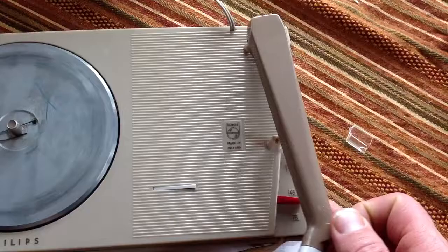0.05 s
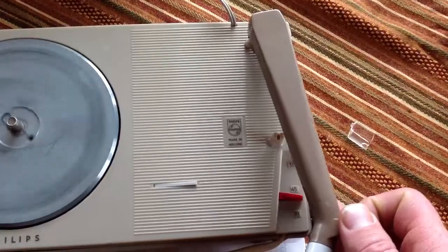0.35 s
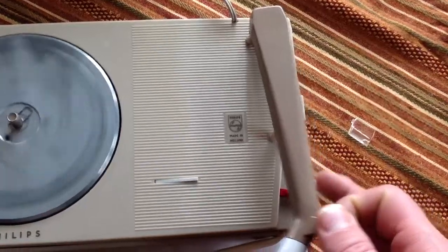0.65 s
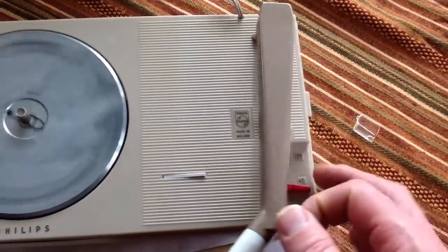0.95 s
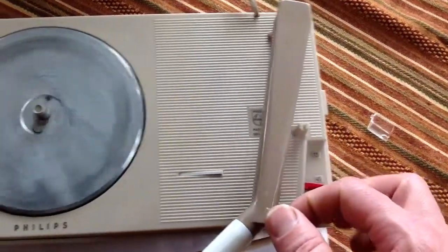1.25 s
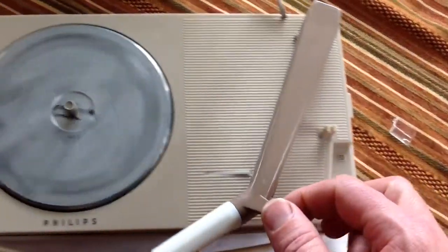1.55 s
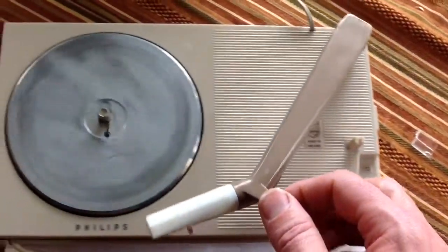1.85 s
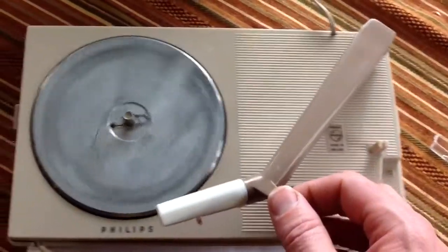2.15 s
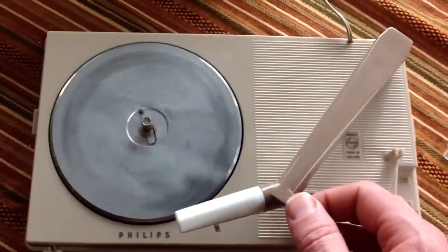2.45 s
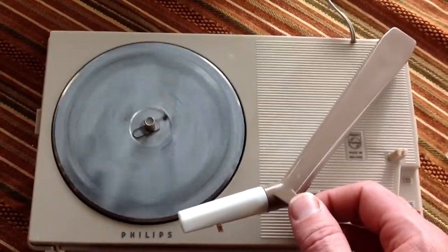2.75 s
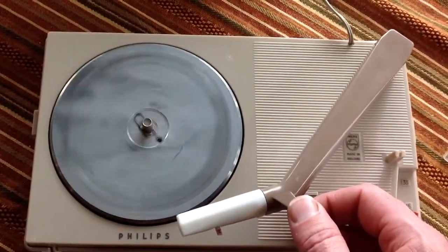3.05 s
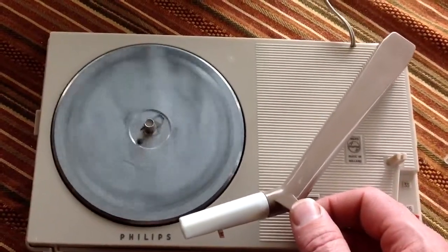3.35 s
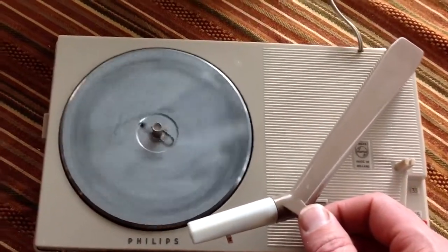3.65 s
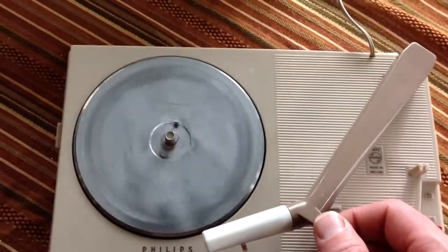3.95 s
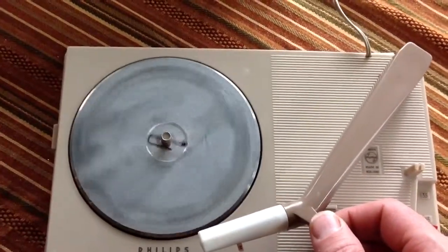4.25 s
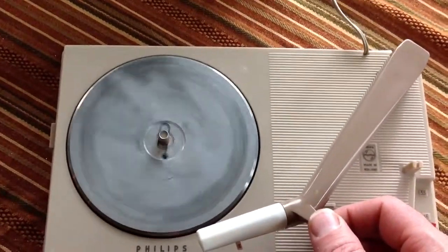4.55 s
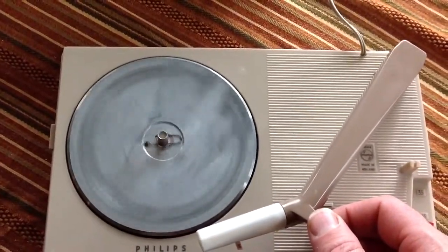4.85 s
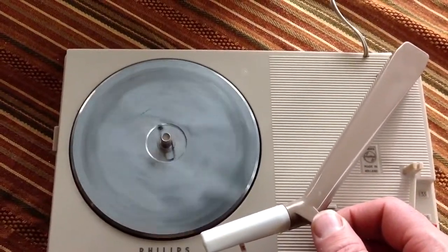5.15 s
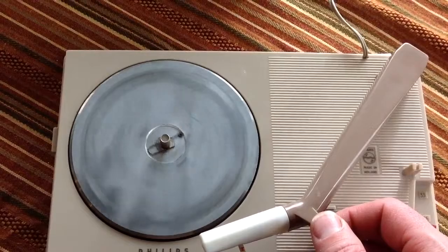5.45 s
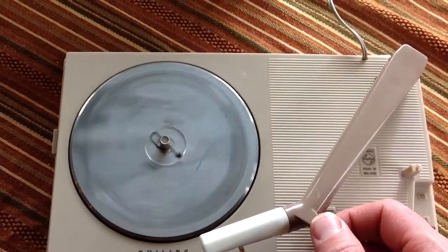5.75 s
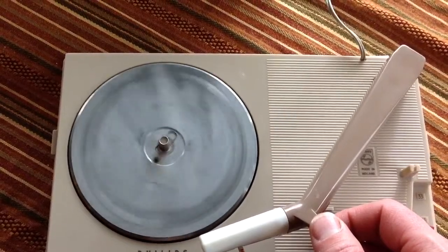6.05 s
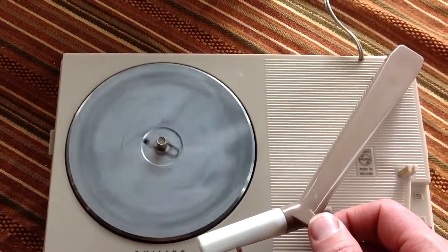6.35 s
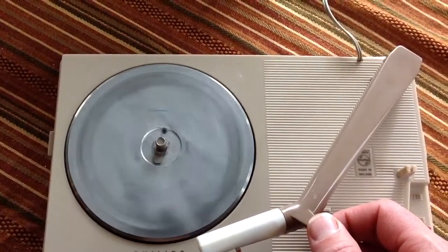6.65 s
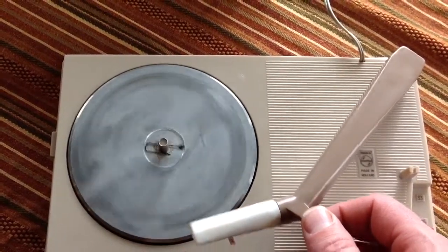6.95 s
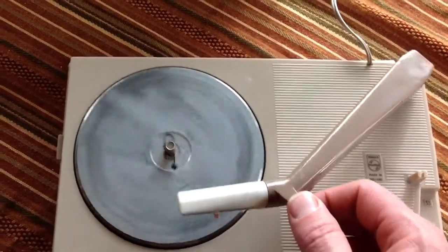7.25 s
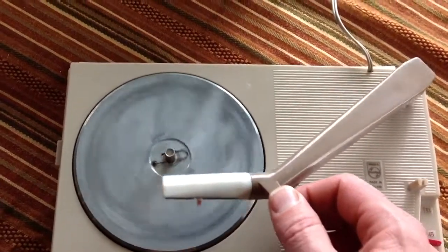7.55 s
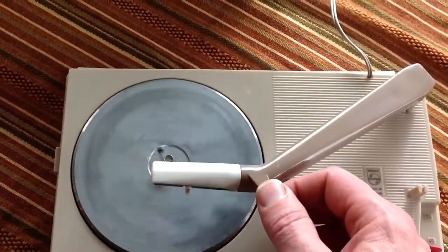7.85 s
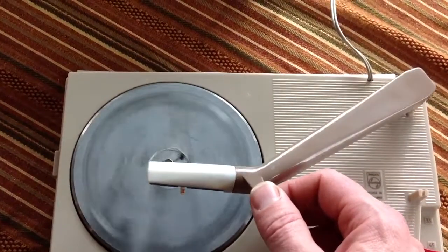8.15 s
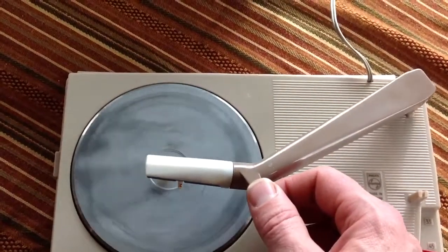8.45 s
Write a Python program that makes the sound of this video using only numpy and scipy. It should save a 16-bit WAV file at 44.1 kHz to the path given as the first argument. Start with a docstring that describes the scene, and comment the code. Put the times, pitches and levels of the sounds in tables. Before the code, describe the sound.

A small plastic record player runs empty in a quiet room, with a low motor hum, a faint hiss and a soft, rapid rubbing from its drive wheel. The tone arm clicks lightly as it leaves its rest. Much later come two faint hollow blips. Near the end the arm trips the switch with a loud, ringing snap, then knocks once more as the hiss fades. It is heard close by, with a short room echo.

```python
"""In a quiet room, a small plastic record player runs empty while a hand swings its tone arm.
Under a faint hiss the motor hums, and a high spot on the drive wheel rubs once a turn. The arm
clicks as it leaves its rest, and later come two faint blips. At the end of its swing the arm trips
the switch with a loud snap, then knocks once more as the hiss fades. Each blow makes the plastic
ring and rattle, and the room echoes it."""
import sys
import numpy as np
from scipy import signal
from scipy.fft import irfft
from scipy.io import wavfile

SR = 44100
rng = np.random.default_rng(int(sys.argv[2]) if len(sys.argv) > 2 else 0)


def bounce(signal):
    """Save signal as a 16-bit WAV file at the path given by the first command-line argument."""
    frames = np.transpose(np.atleast_2d(signal))
    limited = np.clip(frames, -1, 1)
    pcm = np.round(limited * 32767).astype(np.int16)
    wavfile.write(sys.argv[1], SR, pcm)


N = 379701
TIME = np.arange(N) / SR


def amp(db):
    """Turns decibels into a number to multiply by."""
    return 10 ** (np.asarray(db) / 20)


def unit_level(x):
    """Scales a sound so that its average (rms) level is one."""
    return x / np.sqrt(np.mean(x ** 2) + 1e-20)


def look_up(points, hz):
    """Reads between the rows of a table, spacing frequencies by octaves."""
    row_hz, value = np.transpose(points)
    return np.interp(np.log(hz + 1), np.log(row_hz + 1), value)


def add(mix, start_s, sound):
    """Adds a sound to the mix at its start time."""
    part = mix[round(start_s * SR):][:len(sound)]
    part += sound[:len(part)]


def noise(gain, size=N):
    """Noise of level one; gain(hz) sets how strong each frequency is."""
    hz = np.fft.rfftfreq(size, 1 / SR)
    random_phases = np.exp(2j * np.pi * rng.random(len(hz)))
    return unit_level(irfft(gain(hz) * random_phases, size))


def coloured_noise(colour, size=N):
    """Noise whose balance of low and high comes from a table."""
    return noise(lambda hz: amp(look_up(colour, hz)), size)


def noise_band(centre_hz, width_hz):
    """Noise around one frequency; around zero it is a slow drift."""
    return noise(lambda hz: np.exp(-((hz - centre_hz) / width_hz) ** 2 / 2))


# The room's echo. Each row: frequency in Hz, seconds to fade by 60 dB.
ECHO_FADE = [(200, 1), (500, 0.5), (1200, 0.57), (2700, 0.59), (5500, 0.51), (11000, 0.31), (15000, 0.15)]
# The echo's tone. Each row: frequency in Hz, relative level in dB.
ECHO_COLOUR = [(150, -15), (400, -1.5), (900, -1.5), (2500, -4), (6000, -3.5), (10000, -2), (15000, 1)]
def room_echo(sound, build_s):
    """Reflections from the walls build up quickly, then die away, the high notes first."""
    hz, t, bands = signal.stft(rng.standard_normal(SR), SR, nperseg=256)
    level_db = look_up(ECHO_COLOUR, hz)[:, None] - 60 * t / look_up(ECHO_FADE, hz)[:, None]
    tail = signal.istft(bands * amp(level_db), SR, nperseg=256)[1]
    tail *= 1 - np.exp(-(np.arange(len(tail)) / SR / build_s) ** 2)
    return signal.fftconvolve(sound, tail / np.linalg.norm(tail))


# The smooth hiss. Each row: frequency in Hz, relative level in dB.
HISS_COLOUR = [(100, -14), (2500, -2.5), (3300, -0.4), (4300, -1.5), (5800, -2.5), (6900, 4), (7600, -1),
               (9000, 0), (11000, -1), (12400, -1.5), (13200, -0.5), (15200, 1)]
# Thin sizzles. Each row: centre in Hz, width in Hz, level in dB close by, level in dB further back.
SIZZLES = [(6630, 230, -83, -75.5), (8180, 250, -73.5, -81.5), (8880, 120, -78, -84.5),
           (9770, 240, -76.5, -80), (12400, 200, -87, -77), (14230, 400, -75, -67)]
# Where the listener is. Each row: time in seconds, place from 0 (by the arm rest) to 1 (further back).
LISTENER_PLACE = [(1.4, 0), (2.3, 0.94), (6.7, 1), (7.3, 0.86)]
def hiss(level_db=-64, fade_db_per_s=21, sizzle_fade_db_per_s=60, wander_db=1.6):
    """A hiss whose sizzle shifts as the listener moves; after the snap it fades, sizzle first."""
    how_far_back = np.interp(TIME, *np.transpose(LISTENER_PLACE))
    since_snap = np.maximum(TIME - SWITCH_BLOWS[0][0], 0)
    out = amp(level_db - fade_db_per_s * since_snap) * coloured_noise(HISS_COLOUR)
    for hz, width_hz, close_db, back_db in SIZZLES:
        db = close_db + (back_db - close_db) * how_far_back
        db += wander_db * noise_band(0, width_hz=2.5)
        out += amp(db - sizzle_fade_db_per_s * since_snap) * noise_band(hz, width_hz)
    return out


# Two blips. Each row: start in seconds, length in seconds, first and last pitch in Hz, level in dB.
BLIP_NOTES = [(6.445, 0.033, 530, 480, -46.5), (6.483, 0.071, 412, 463, -50.5)]
def blips():
    """Faint, hollow tones that swell and fade while their pitch slides."""
    out = np.zeros(N)
    for start_s, length_s, first_hz, last_hz, db in BLIP_NOTES:
        hz = np.linspace(first_hz, last_hz, int(length_s * SR))
        tone = np.sin(2 * np.pi * np.cumsum(hz) / SR)
        add(out, start_s, amp(db) * np.hanning(len(hz)) * tone)
    return out


# The motor's tones. Each row: pitch in Hz, level in dB, waver from 0 (steady) to 1 (all noise).
MOTOR_TONES = [(120, -62.5, 0.01), (189, -59.5, 0.2), (239.5, -71, 0.6), (307, -75, 0.6),
               (357.6, -70.5, 0.4), (541, -68, 0.38), (561, -75.5, 0.54), (664, -72, 0.47),
               (766, -71.5, 0.89)]
# The drive's whirr. Each row: frequency in Hz, relative level in dB.
WHIRR_COLOUR = [(25, -51), (60, -25), (100, -13.5), (150, -1.5), (185, 2.5), (250, 1.5), (420, -4.5),
                (550, -2), (760, -2.5), (900, -5.5), (1400, -6.5), (1650, -15.5), (2200, -17), (4000, -31)]
def motor(whirr_db=-57):
    """The motor gives a steady mains hum and wavering running tones over a low whirr."""
    out = amp(whirr_db) * coloured_noise(WHIRR_COLOUR)
    for hz, db, waver in MOTOR_TONES:
        steady = np.sqrt(2 * (1 - waver ** 2)) * np.sin(2 * np.pi * hz * TIME)
        out += amp(db) * (steady + waver * noise_band(hz, width_hz=8.5))
    return out


# The wheel slows a touch midway. Each row: time in seconds, speed in turns per second.
WHEEL_SPEED = [(4.2, 18.29), (5, 18.2)]
# The wheel's rub. Each row: frequency in Hz, relative level in dB.
RUB_COLOUR = [(300, -23), (700, -9.5), (1100, -3.5), (1230, 7), (1300, -6), (1400, 5.5), (1560, -9),
              (1710, -14), (1830, 2.5), (1920, -4.5), (2400, -10), (2650, -20.5), (3300, -16.5),
              (3900, -25.5), (6000, -31)]
def drive_wheel(rub_db=-61.5, uneven_db=0.5, start_turns=-0.28, fade_turns=0.34):
    """A high spot on the wheel rubs once a turn, with a weaker touch later in the turn."""
    speed = np.interp(TIME, *np.transpose(WHEEL_SPEED))
    turns = start_turns + np.cumsum(speed) / SR
    touch = lambda at_turn: np.exp(-(((turns - at_turn) % 1) / fade_turns) ** 2)
    steady, high_spot, weaker_touch = 0.22, touch(0), 0.33 * touch(0.6)
    pressure = np.sqrt(steady ** 2 + high_spot ** 2 + weaker_touch ** 2)
    level = amp(rub_db + uneven_db * noise_band(0, width_hz=17))
    return level * unit_level(pressure * coloured_noise(RUB_COLOUR))


def strike_plastic(blows, notes, rattle_colour, ring_db, rattle_db, lowest_hz, echo_db, echo_ring_db):
    """Each blow rings a few clear notes and a rattle of many crowded ones; the room answers."""
    out = np.zeros(N)
    t = np.arange(SR // 4) / SR
    ring = sum(amp(db - 60 * t / fade_s) * np.sin(2 * np.pi * hz * t) * (-1) ** k
               for k, (hz, db, fade_s) in enumerate(notes))
    # small plastic parts give off little bass
    bass_cut = signal.butter(3, lowest_hz, "high", fs=SR, output="sos")
    for start_s, db, treble_hz, fade_s in blows:
        rattle = coloured_noise(rattle_colour, len(t)) * amp(-60 * t / fade_s)
        parts = signal.sosfilt(bass_cut, [amp(db + ring_db) * ring, amp(db + rattle_db) * rattle])
        # a softer blow has less treble
        pole = np.exp(-2 * np.pi * treble_hz / SR)
        tone, crack = signal.lfilter([(1 - pole) ** 2], np.poly([pole, pole]), parts)
        add(out, start_s, tone + crack)
        # the notes are heard mostly close by; the crack fills the room
        echo = room_echo(amp(echo_ring_db) * tone + crack, build_s=0.0037)
        add(out, start_s, amp(echo_db) * echo)
    return out


# The arm's knocks. Each row: start in seconds, relative level in dB, treble limit in Hz (higher
# for a harder blow), seconds for the rattle to fade by 60 dB.
ARM_BLOWS = [(0.0968, -20, 13000, 0.02), (0.0988, -23, 15000, 0.016), (0.1007, -27.5, 3500, 0.015),
             (0.3888, -23.5, 450, .022), (8.4556, -33, 10500, 0.043), (8.4570, -19, 1210, 0.007),
             (8.4602, -29.5, 1190, .014)]
# The arm's ringing. Each row: pitch in Hz, relative level in dB, seconds to fade by 60 dB.
ARM_NOTES = [(580, -3.5, 0.029), (637, -11.5, 0.11), (777, -3.5, 0.045), (1247, 0, 0.03),
             (1890, -9.5, 0.02), (2180, -4, 0.019), (6270, -10, 0.016)]
# The arm's rattle. Each row: frequency in Hz, relative level in dB.
ARM_COLOUR = [(100, -30), (330, -21), (550, -0.5), (1200, -3.5), (2200, 0.5), (3200, -6.5), (6500, -5),
              (10000, -10.5), (15000, -6.5)]
def tone_arm():
    """The arm clicks lightly as it leaves its rest and knocks once more after the snap."""
    return strike_plastic(ARM_BLOWS, ARM_NOTES, ARM_COLOUR, ring_db=-5, rattle_db=1.5,
                          lowest_hz=362, echo_db=-10, echo_ring_db=-5)


# The switch's snap. Each row: start in seconds, relative level in dB, treble limit in Hz,
# seconds for the rattle to fade by 60 dB.
SWITCH_BLOWS = [(8.1792, -29, 13000, 0.043), (8.1857, -17, 14100, 0.092), (8.1868, -12.5, 9000, 0.04),
                (8.1903, -21, 10000, 0.024), (8.1973, -19, 6500, 0.13)]
# The case's ringing. Each row: pitch in Hz, relative level in dB, seconds to fade by 60 dB.
CASE_NOTES = [(345, -18, 0.1), (446, -6, 0.075), (534, -9, 0.077), (653, -17, 0.06), (808, -13.5, 0.12),
              (1088, -5, 0.055), (1197, 1, 0.045), (1380, -5.5, 0.099), (1885, -15, 0.074),
              (2240, -7.5, 0.049), (2784, -7, 0.039), (3000, -11, 0.043), (5370, -18, .06),
              (6390, -10.5, 0.076)]
# The case's rattle. Each row: frequency in Hz, relative level in dB.
CASE_COLOUR = [(80, -33), (170, -12), (420, -2), (700, -1), (1200, -3.5), (1600, -3.5), (2800, -4.5),
               (4000, -5), (6500, -5.5), (9000, -6), (14500, 0)]
def switch_snap():
    """The switch lets go, strikes home and bounces, making the plastic case ring."""
    return strike_plastic(SWITCH_BLOWS, CASE_NOTES, CASE_COLOUR, ring_db=-1.5, rattle_db=3.5,
                          lowest_hz=217, echo_db=-8.5, echo_ring_db=-8)


def scene():
    """The clicks and the snap over the running player, in one channel."""
    clicks = tone_arm() + switch_snap()
    drive = motor() + drive_wheel()
    return (clicks + drive + hiss() + blips())[None]


def record(dry, highest_hz=15300):
    """Cuts away the very highest treble."""
    treble_cut = signal.firwin(511, highest_hz, window=("kaiser", 9), fs=SR)
    return signal.oaconvolve(dry, treble_cut[None], "same")


dry = scene()
out = record(dry)
bounce(out)
```